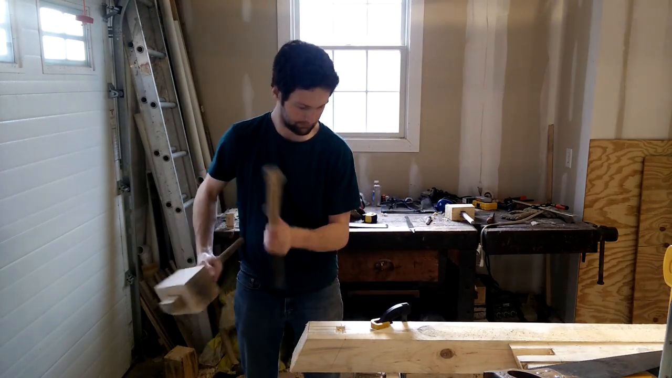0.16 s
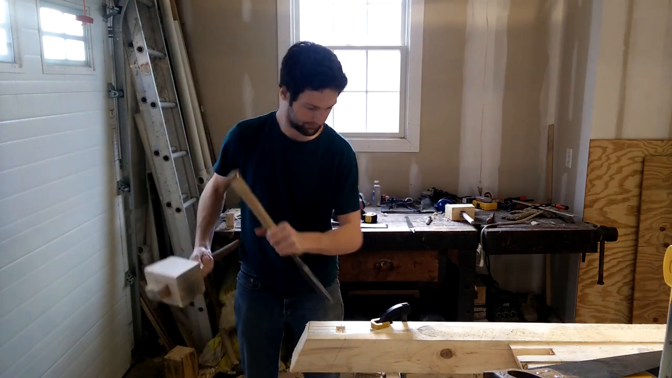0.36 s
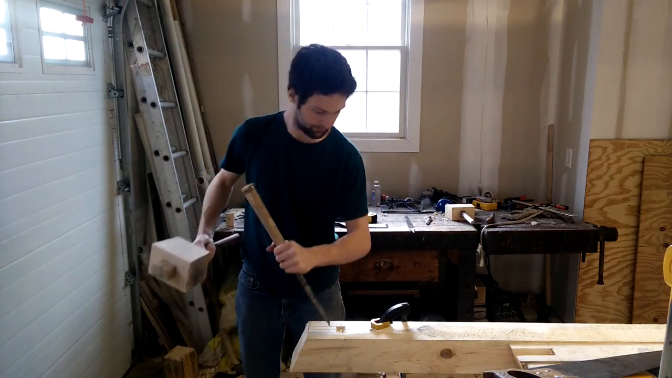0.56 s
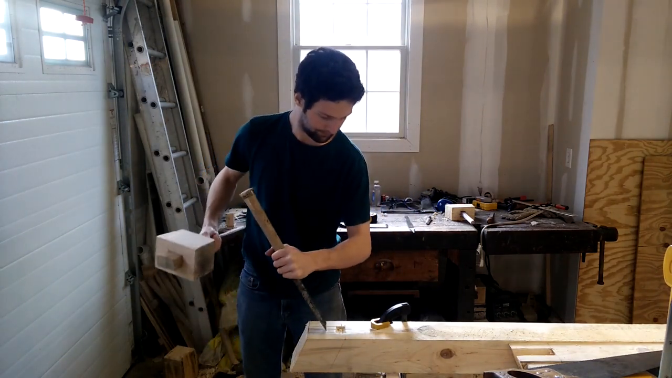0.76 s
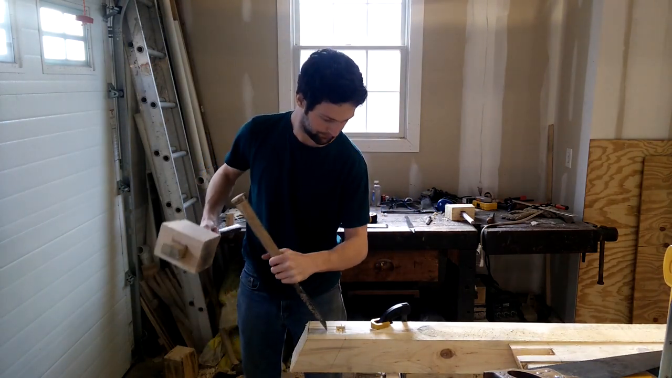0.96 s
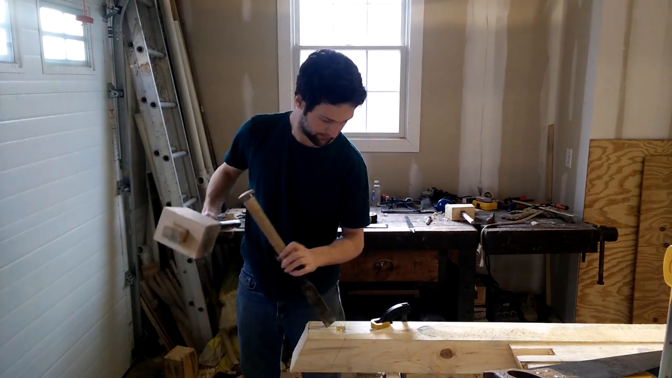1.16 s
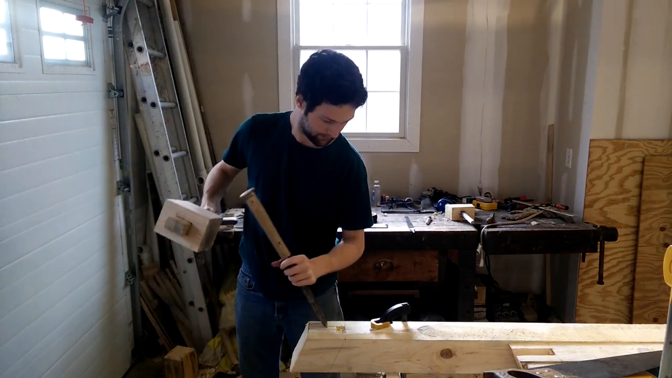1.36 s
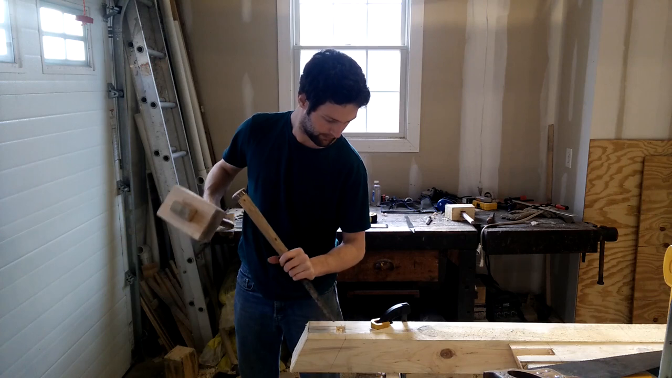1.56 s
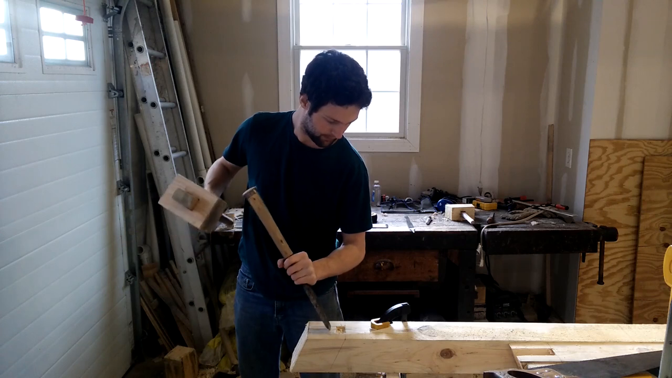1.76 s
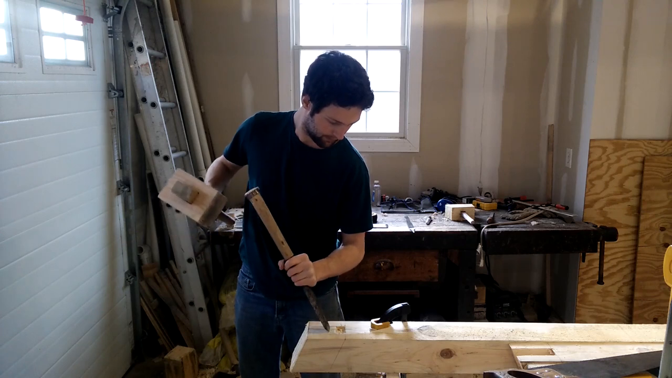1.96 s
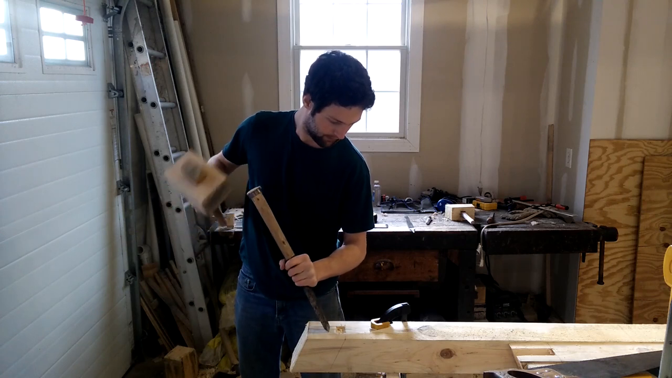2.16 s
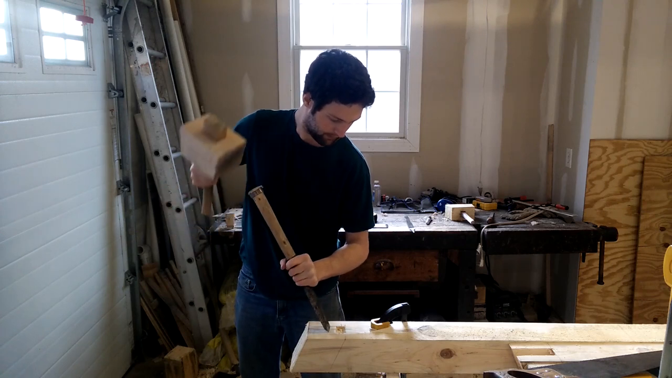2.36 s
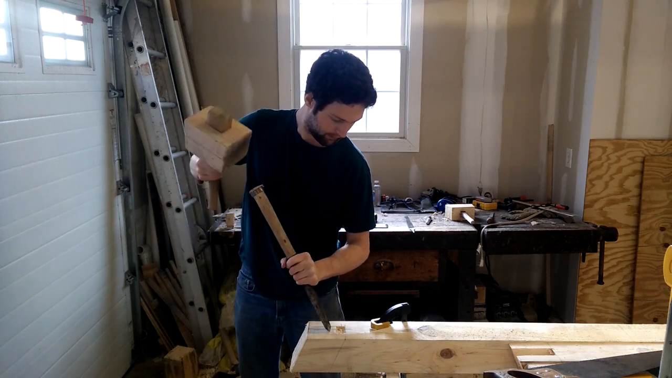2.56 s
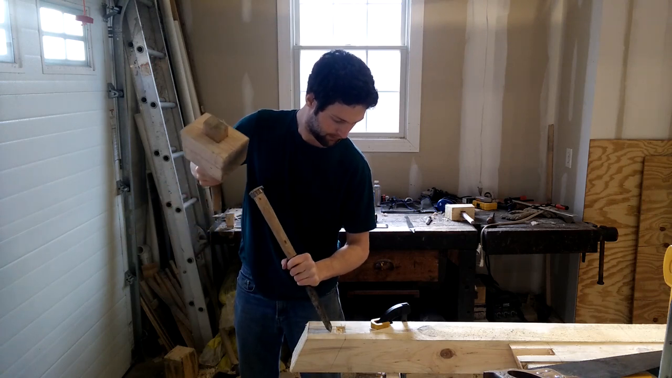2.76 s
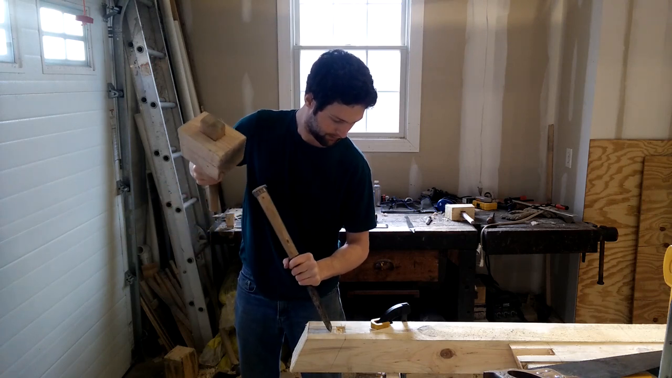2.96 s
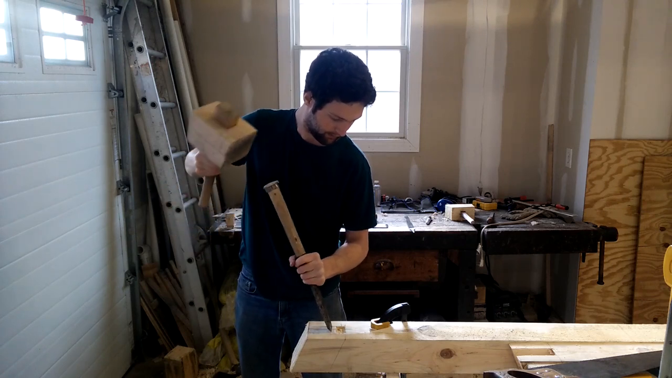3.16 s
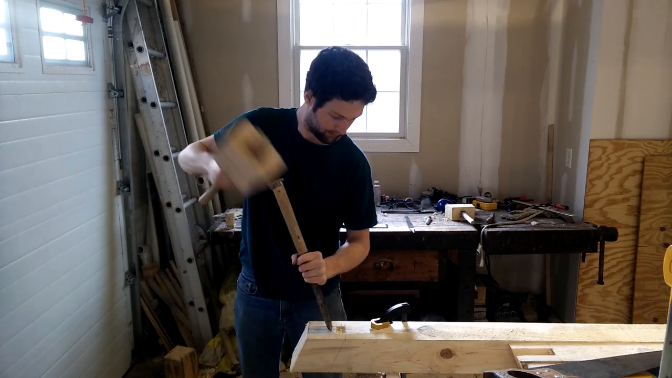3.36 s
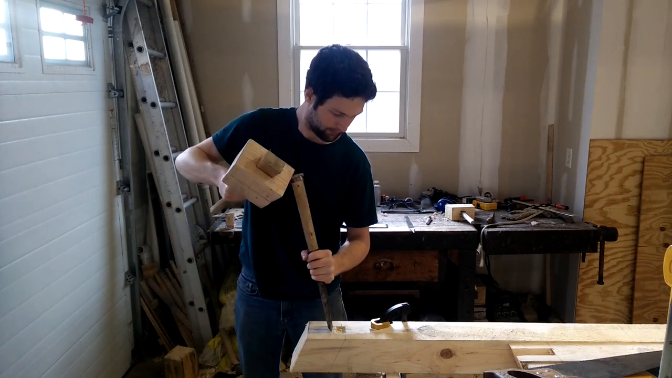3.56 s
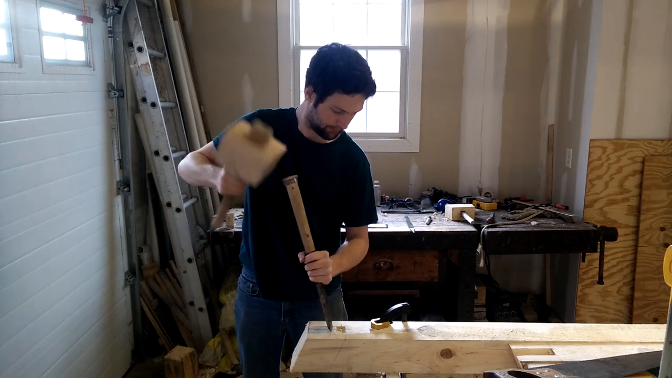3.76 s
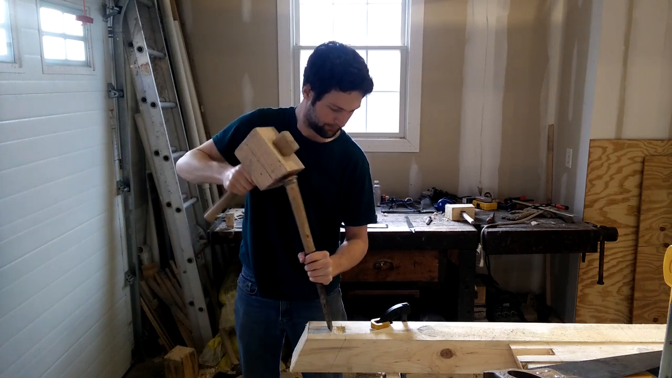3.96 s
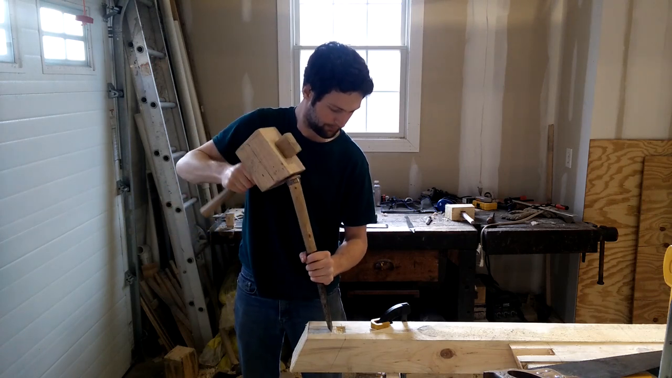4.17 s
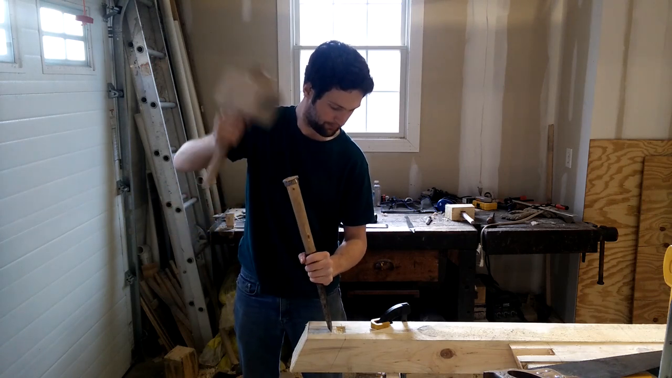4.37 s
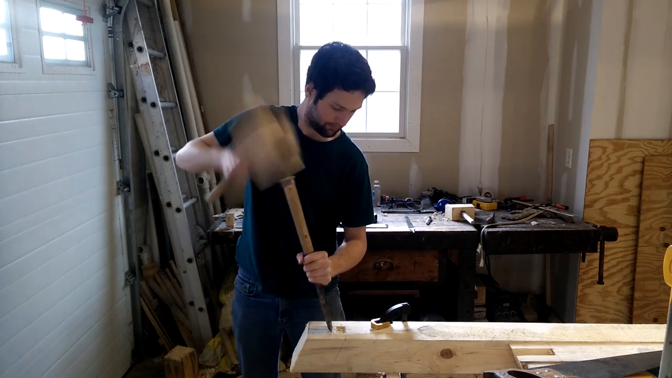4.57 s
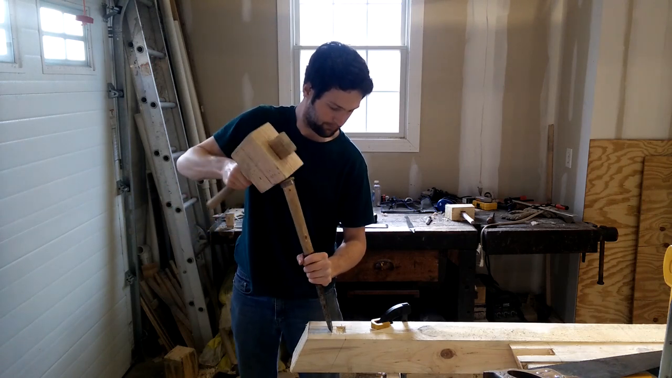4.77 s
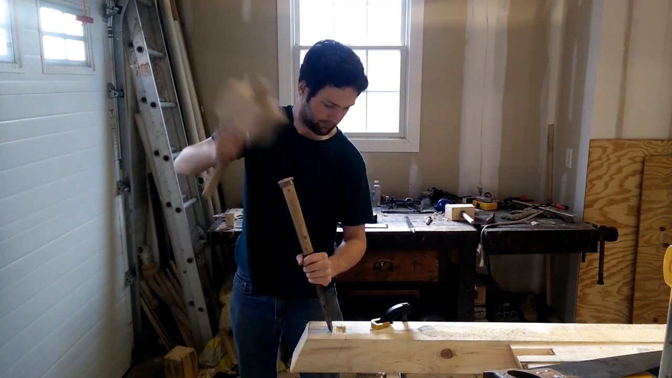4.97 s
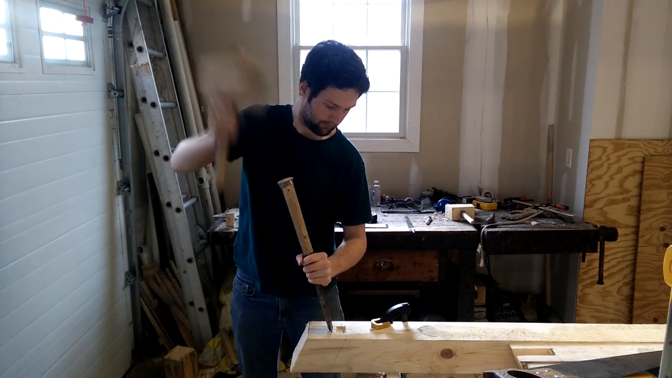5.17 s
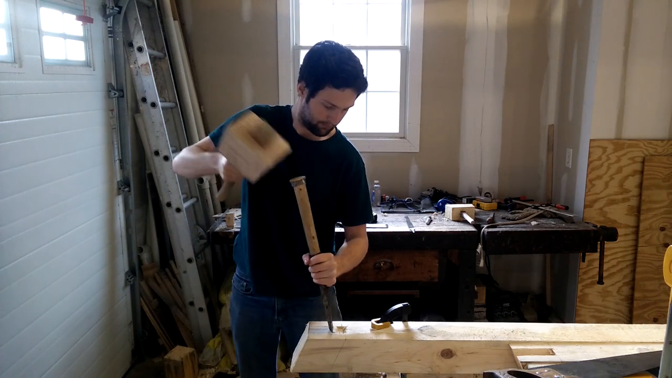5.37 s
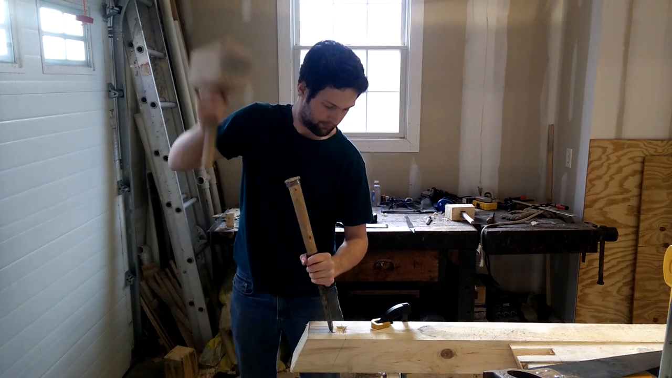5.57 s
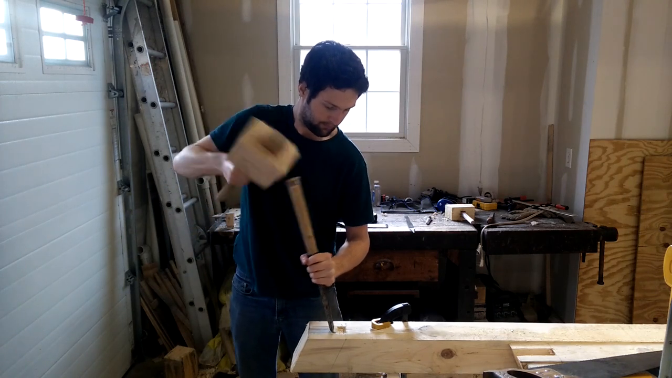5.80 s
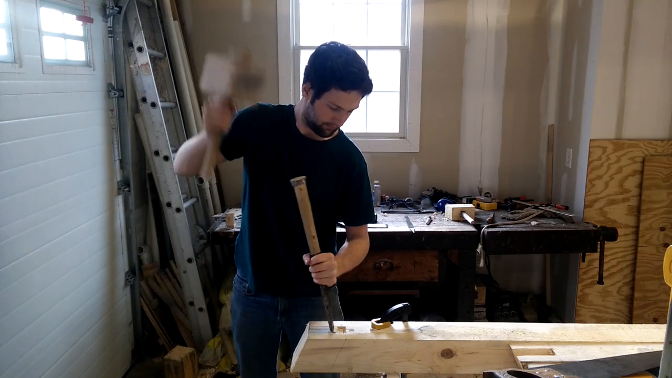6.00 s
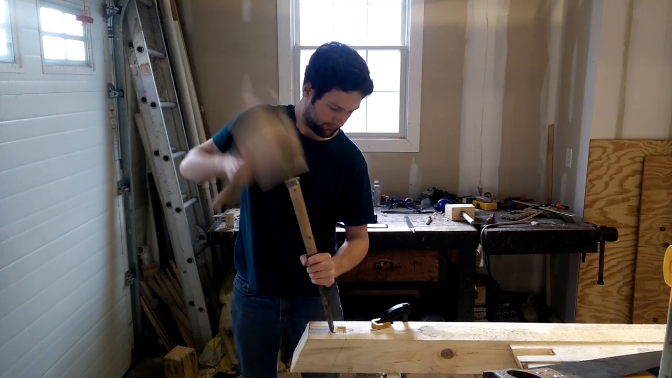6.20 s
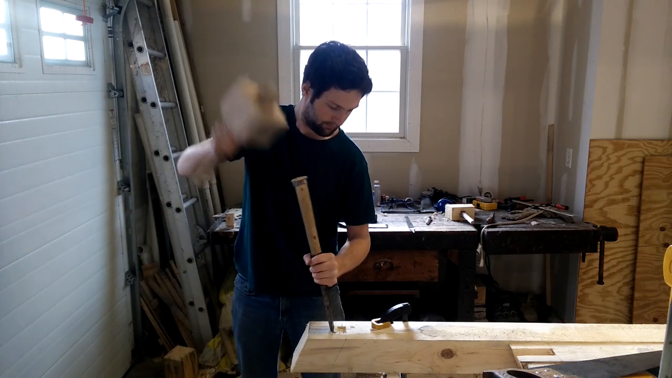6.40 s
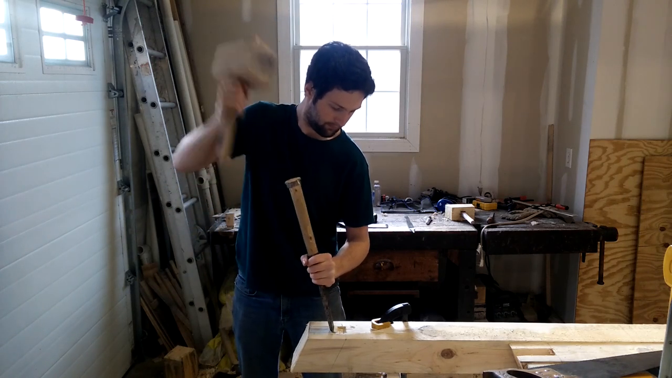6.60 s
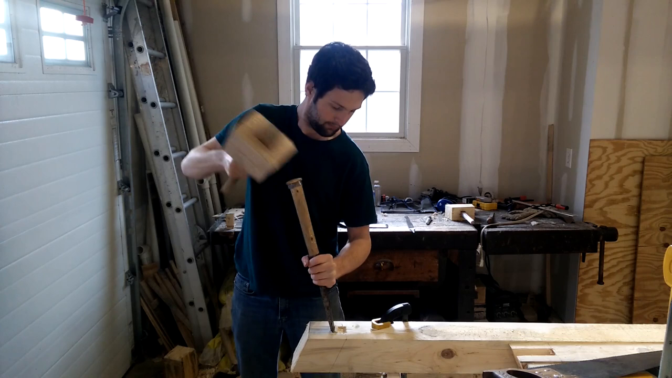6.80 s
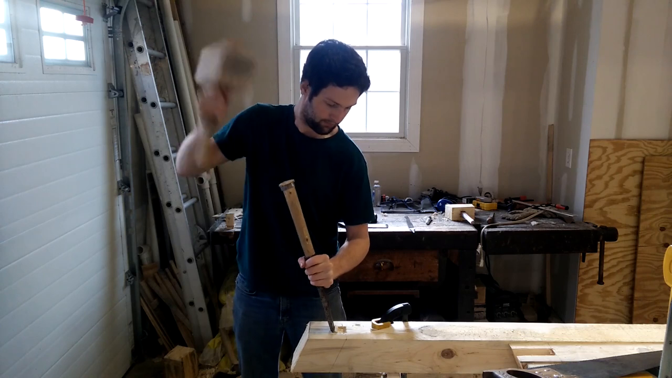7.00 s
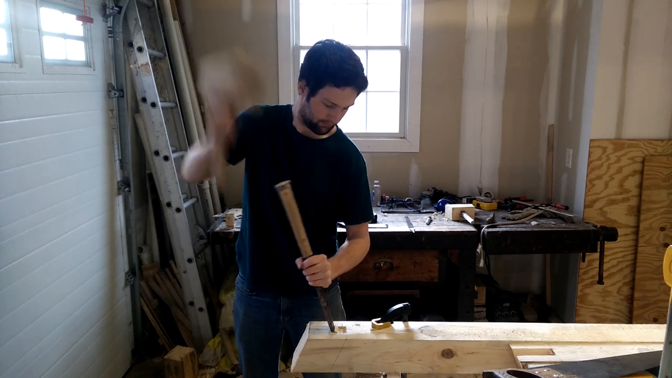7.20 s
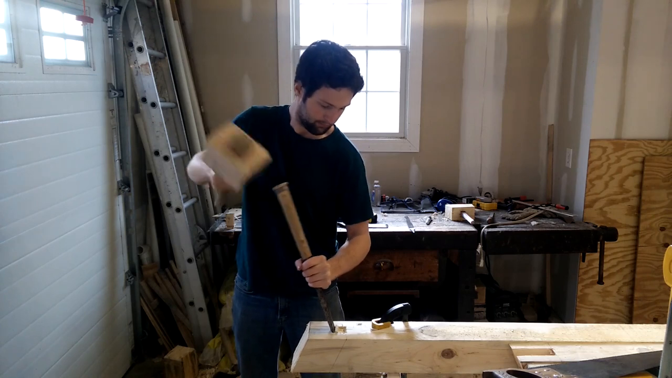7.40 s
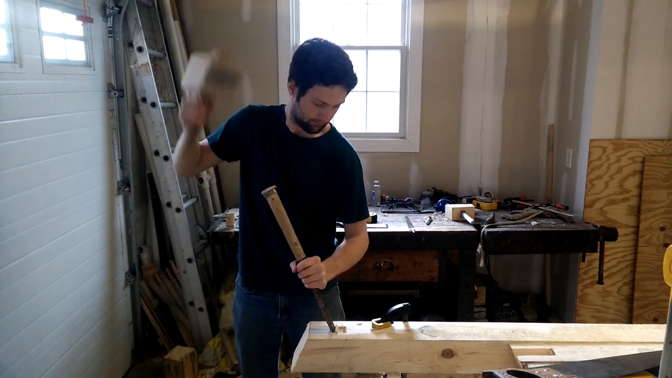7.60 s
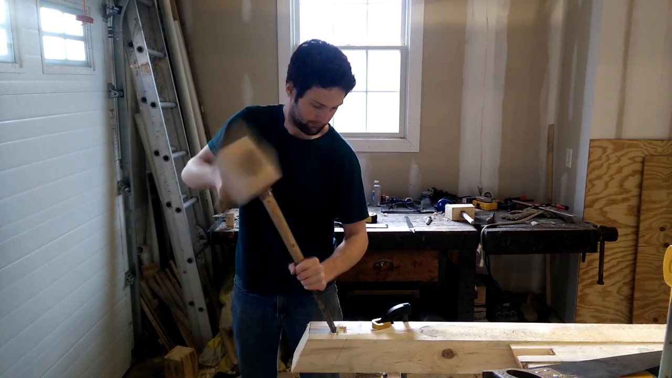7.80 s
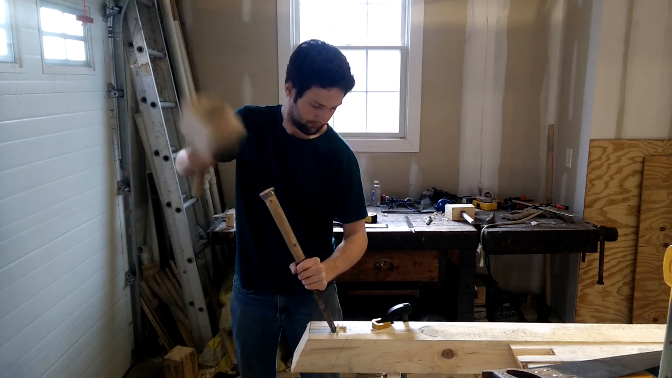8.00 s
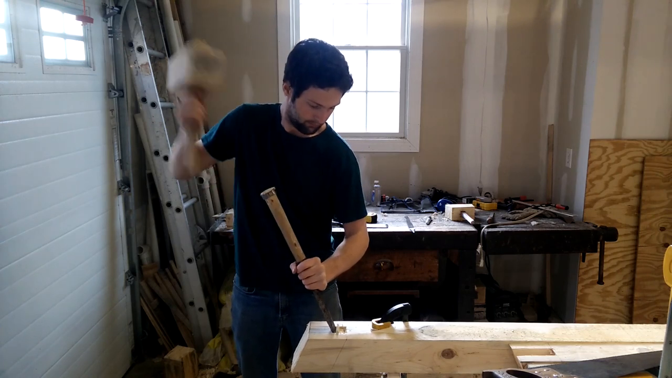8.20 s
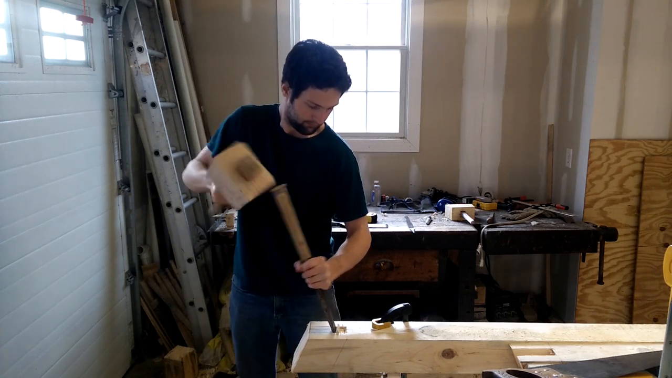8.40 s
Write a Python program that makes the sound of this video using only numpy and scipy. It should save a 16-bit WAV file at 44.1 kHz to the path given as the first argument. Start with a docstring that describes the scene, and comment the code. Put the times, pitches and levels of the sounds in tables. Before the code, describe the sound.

Quiet low room rumble and soft gritty footfalls come first, then two moderate knocks of a wooden mallet on a chisel, with short rising squeaks of steel in wood. Eight much harder blows follow in a steady run, booming through the timber and floor and ringing around the hard room. Their peaks distort in the stereo microphone; the right side is brighter and louder than the muffled left.

```python
"""A low rumble fills a bare, echoing workshop, made of noise shaped in pitch.
A worker shifts his feet: short thumps, gritty ticks and slides, all of them noise bursts.
The chisel edge squeaks (short rising tones) around two easy blows of a heavy wooden mallet.
Then come eight hard blows into the timber beam: noise for crack, clatter and thud, fading sines for ringing.
The hard blows overload a stereo microphone whose left side is dull."""
import sys
import numpy as np
from scipy import signal
from scipy.fft import rfft, irfft, next_fast_len
from scipy.io import wavfile
from scipy.ndimage import uniform_filter1d

SR = 44100
rng = np.random.default_rng(int(sys.argv[2]) if len(sys.argv) > 2 else 0)


def to_wav(sig):
    """Store sig (one row per channel, or 1-D mono) as 16-bit WAV at the path in sys.argv[1].

    Samples outside -1..1 are clipped; the rate is SR.
    """
    pcm = np.clip(np.atleast_2d(sig), -1, 1) * 32767
    pcm = np.round(pcm).astype(np.int16)
    wavfile.write(sys.argv[1], SR, pcm.T)  # frames by channels


N = 372644
RING = int(1.4 * SR)  # length of one event with its echo, in samples
AGE = np.arange(RING) / SR  # time since an event began, in seconds


def undb(db):
    """Turn decibels into a plain multiplier: 20 dB is ten times the amplitude."""
    return 10 ** (np.asarray(db) / 20)


def along(points, n):
    """Read a table of (frequency [Hz], value) at each frequency of an n-sample spectrum, on a log axis."""
    hz, value = np.transpose(points)
    bins_hz = np.arange(n // 2 + 1) * SR / n
    return np.interp(np.log(bins_hz + 1), np.log(hz), value)


# how alike the two sides of the microphone hear the room: (frequency [Hz], correlation)
SIDE_LIKENESS = [(60, 0.92), (130, 0.93), (290, 0.88), (640, 0.41), (1400, 0.19), (16000, 0.42)]


def air(n):
    """Stereo noise arriving from all around: long waves reach both sides alike, short waves do not."""
    mid, side = rfft(rng.standard_normal((2, n)))
    alike = np.clip(along(SIDE_LIKENESS, n), -1, 1)
    shared = mid * np.sqrt((1 + alike) / 2)
    opposed = side * np.sqrt((1 - alike) / 2)
    return irfft(shared + np.array([[1], [-1]]) * opposed, n)


def tint(x, colour):
    """Colour noise by making some frequencies stronger than others, then set its rms to 1."""
    n = x.shape[-1]
    y = irfft(rfft(x) * undb(along(colour, n)), n)
    return y / np.std(y)


def steady(x, seconds):
    """Even out the slow swells of noise by dividing by its own running loudness."""
    power = np.mean(x ** 2, axis=0)
    running = uniform_filter1d(power, int(seconds * SR))
    return x / np.sqrt(running / np.mean(x ** 2) + 1e-6)


def fade(t60):
    """Die away by the same ratio every moment, 60 dB down after t60 seconds."""
    return np.exp(-np.log(1000) * AGE / t60)


def add(out, s, x):
    """Mix a sound in at time s, in seconds."""
    start = int(max(s, 0) * SR)
    out[:, start:start + x.shape[1]] += x[:, :N - start]


# how long the workshop echoes: (frequency [Hz], time to fall 60 dB [s])
ROOM_DECAY = [(40, 0.94), (130, 0.47), (330, 0.85), (900, 0.91), (2400, 0.79), (6400, 0.65), (14000, 0.45)]


def room(x, bloom_cycles=2.44):
    """Walls soak up each band of noise at its own pace; low bands take longer to build up."""
    spectrum, out = rfft(x), 0
    for k, (hz, t60) in enumerate(ROOM_DECAY):
        share = along([(f, j == k) for j, (f, _) in enumerate(ROOM_DECAY)], RING)
        band = steady(irfft(spectrum * share, RING), 0.13)
        build_up = 1 - np.exp(-AGE * hz / bloom_cycles)
        out = out + band * fade(t60) * build_up
    return out


# colour of the workshop rumble: (frequency [Hz], level [dB])
RUMBLE_COLOUR = [(15, -56), (25, -29.5), (43, -1.5), (59, -5.5), (114, -7), (175, -7.5), (301, -13),
                 (503, -20), (560, -25), (775, -27.5), (863, -30), (1890, -32.5), (4250, -44),
                 (6560, -39.5), (16000, -87)]


def background(level_db=-41.5, rumble_cut_hz=28):
    """The low, even rumble of the workshop: coloured noise with the deepest part filtered off."""
    high_pass = signal.butter(2, rumble_cut_hz, "high", fs=SR, output="sos")
    return signal.sosfilt(high_pass, tint(air(N), RUMBLE_COLOUR)) * undb(level_db)


# colour of grit under a shoe: (frequency [Hz], level [dB])
GRIT_COLOUR = [(80, -30), (400, 8.5), (700, -1), (1200, -4.5), (1900, -3), (3000, -12), (4500, -9),
               (6800, -19.5), (9000, -35.5), (16000, -45.5)]


def grit(n, spread_db=2.5):
    """Grit crunches grain by grain: noise cut into millisecond pieces of uneven strength."""
    grain = SR // 1000
    # most grains are weak, a few are strong
    sizes = undb(spread_db * np.minimum(rng.exponential(size=n // grain + 1), 4))
    return tint(air(n) * np.repeat(sizes, grain)[:n], GRIT_COLOUR)


# a sole sliding over the floor, or the blade rubbing in its cut: (time [s], length [s], level [dB])
SLIDE_TIMES = [(0, 0.22, -57.5), (1.969, 0.14, -44.5), (2.28, 0.32, -43.5), (3.05, 0.46, -54),
               (4.302, 0.43, -47.5)]


def sliding(rise_s=0.049, t60_s=0.69):
    """Each slide swells, holds for its length and dies away, rasping over grit."""
    out = np.zeros((2, N))
    for s, length, db in SLIDE_TIMES:
        rise = np.minimum(AGE / rise_s, 1)
        release = np.minimum(np.exp(-np.log(1000) * (AGE - length) / t60_s), 1)
        add(out, s, undb(db) * rise * release * grit(RING))
    return out


# soft footfalls: (time [s], level [dB])
FOOTFALLS = [(.765, -27), (1.994, -22), (2.555, -29.5), (2.845, -31.5)]
# colour of a footfall: (frequency [Hz], level [dB])
FOOTFALL_COLOUR = [(30, -34), (80, 2), (150, -2), (200, -1.5), (265, -1), (340, -16.5), (700, -23),
                   (1500, -39), (5000, -47), (9000, -60), (16000, -65)]


def footfalls(t60=0.21, room_db=-3, rise_s=0.0064):
    """A sole thumps the floor: a short dull noise burst with its echo."""
    out = np.zeros((2, N))
    for s, db in FOOTFALLS:
        thump = steady(tint(air(RING), FOOTFALL_COLOUR), 0.032) * fade(t60)
        thump += undb(room_db) * room(tint(air(RING), FOOTFALL_COLOUR))
        add(out, s, undb(db) * thump * (1 - np.exp(-AGE / rise_s)))
    return out


# grit under a shoe and small knocks of handling: (time [s], level [dB])
SCUFF_TIMES = [(.76, -41), (2.226, -28), (2.295, -36), (2.439, -38), (2.524, -25), (2.554, -25.5),
               (2.815, -40.5), (3.322, -41.5)]
# colour of the tick that rings in a scuff: (frequency [Hz], level [dB])
TICK_COLOUR = [(2500, -28), (4000, -8), (4700, 2), (5500, -15), (8000, -42)]


def scuffs(grit_t60=0.04, room_db=-10, rise_s=0.0015, tick_db=-7, tick_t60=0.031):
    """Grit is crushed in a brief crunch, with a high tick and a faint echo."""
    out = np.zeros((2, N))
    for s, db in SCUFF_TIMES:
        scuff = grit(RING) * fade(grit_t60)
        scuff += undb(room_db) * room(tint(air(RING), GRIT_COLOUR))
        scuff += undb(tick_db) * tint(air(RING), TICK_COLOUR) * fade(tick_t60)
        add(out, s, undb(db) * scuff * (1 - np.exp(-AGE / rise_s)))
    return out


# the blade squeaks as it is rocked in the cut: (time [s], middle pitch [Hz], level [dB], length [s])
SQUEAK_TIMES = [(3.287, 1800, -43.5, 0.022), (3.903, 1990, -24, 0.011), (3.923, 1933, -10, 0.0084),
                (4.468, 1990, -38.5, 0.018)]
# colour of the rasp that goes with a squeak: (frequency [Hz], level [dB])
RASP_COLOUR = [(300, -24), (1200, 0), (2100, -8.5), (3200, -7), (5500, -13.5), (7200, -18.5), (9500, -32),
               (16000, -39)]


def squeaks(glide=0.37, rasp_db=-23, room_db=-1, direct_left_db=-8):
    """Steel slips against the wood in a short rising chirp and a rasp, which the room prolongs."""
    out = np.zeros((2, N))
    for s, hz, db, length in SQUEAK_TIMES:
        progress = np.linspace(0, 1, int(length * SR))
        # glide is the whole rise in pitch, as a part of the middle pitch
        pitch_hz = hz * (1 + glide * (progress - .5))
        chirp = np.sin(2 * np.pi * np.cumsum(pitch_hz) / SR) * np.sin(np.pi * progress) ** 2
        echoes = room(air(RING))
        echoes = undb(room_db) * echoes / np.linalg.norm(echoes[1])
        # the direct sound comes first, weaker on the left
        echoes[:, 0] += undb([direct_left_db, 0])
        add(out, s, undb(db) * signal.fftconvolve(echoes, chirp[None], axes=1))
        add(out, s, undb(db + rasp_db) * room(tint(air(RING), RASP_COLOUR)))
    return out


def by_strength(at_0_db, change_per_db, strength_db):
    """A quality of a blow that follows its strength in a straight line."""
    return at_0_db + change_per_db * strength_db


def region(hz, centre_hz, octaves):
    """A bell-shaped weight around one frequency, where one wooden or steel part rings."""
    return np.exp(-(np.log2(hz / centre_hz) / octaves) ** 2)


def blow_colour(hz, strength_db, clack_db, blade_db):
    """How a blow shares its force among beam, handle and blade, in dB; harder blows are brighter."""
    tilt_db = by_strength(0.26, 0.11, strength_db)  # dB per octave
    # the boom of the beam grows less than the rest
    boom_db = by_strength(0.8, -0.5, strength_db)
    beam = boom_db * region(hz, 250, .35)
    handle = clack_db * region(hz, 1300, .42)
    blade = blade_db * region(hz, 3290, .13)
    return tilt_db * np.log2(hz / 500) + beam + handle + blade


# what beam, chisel and room ring with: (frequency [Hz], level [dB], time to fall 60 dB [s])
RINGING_TONES = [(52.2, -13, 1.23), (87.6, 0, 0.47), (133.7, 3.5, 0.19), (177.8, 3.5, 0.21),
                 (243.3, -0.5, 0.77), (265.1, -1.5, 0.75), (279.7, -4.5, 0.88), (323.6, -4.5, 0.79),
                 (344.4, 3, 0.51), (369.6, 1.5, 0.5), (384.8, -3.5, 0.65), (394.6, -1.5, 0.92),
                 (417, -4, 0.67), (430, -4, 0.76), (512.6, -5.5, 0.76), (528, -4, 0.67),
                 (577.5, -6.5, 0.55), (606, -7, 0.8), (629, -0.5, 0.89), (657.6, -7, 0.71),
                 (730.4, -7, 0.84), (751.2, -1.5, 0.79), (752, -2, 0.74), (905, 1, 0.71), (1021, -17, 0.97),
                 (1167, -9.5, 0.89), (1243, -15, 0.72), (1258, -9.5, 0.72), (1317, -6.5, 0.75),
                 (1503, -12.5, 0.82)]


def ringing(colour, port_phase, scatter_db=1.5, detune=0.0009, build_cycles=0.86):
    """Struck parts ring in fading tones, levels and pitches varied slightly at random from blow to blow."""
    out = 0
    variation = rng.standard_normal((len(RINGING_TONES), 2))
    for (hz, db, t60), (start, lag), (size, shift) in zip(RINGING_TONES, port_phase, variation):
        # short waves reach the two sides out of step
        side_step = np.array([[0], [np.sign(lag - .5) * min(hz / 520, 1.5)]])
        phase = 2 * np.pi * (hz * (1 + detune * shift) * AGE + start) + side_step
        level = undb(db + scatter_db * size + colour(hz))
        build_up = 1 - np.exp(-AGE * hz / build_cycles)
        out = out + level * np.sin(phase) * fade(t60) * build_up
    return out


# colour of the thud as trestles and floor take the force: (frequency [Hz], level [dB])
THUD_COLOUR = [(25, -25.5), (65, -19), (85, -3.5), (130, -1.5), (152, -11), (172, 2.5), (200, -21.5),
               (400, -36), (2000, -76.5)]


def floor_thud(t60=0.25, rise_s=0.022):
    """The heavy beam is slow to get moving, so this deep noise burst swells late."""
    rise = 1 - np.exp(-(AGE / rise_s) ** 2)
    return steady(tint(air(RING), THUD_COLOUR), 0.042) * fade(t60) * rise


# mallet blows; the last three levels are added to those parts of the blow:
# (time [s], strength [dB], crack [dB], handle clack [dB], blade ring [dB])
MALLET_BLOWS = [(3.4635, -11.5, 3, 3.5, 2.5), (4.0187, -11, -20, -3.5, 2), (4.661, 0, 3, 0.5, -2.5),
                (5.321, 1, -1, 0, 1.5), (5.844, 1.5, 4, 0.5, -3.5), (6.301, 2, 1.5, 1.5, -3),
                (6.789, 2, 2.5, 2, -1), (7.324, 0, 5, 1, 3), (7.856, -0.5, 2, 1.5, 8),
                (8.366, 1.5, 11.5, -0.5, 8.5)]
# dense wooden clatter of a blow as it fills the room: (frequency [Hz], level [dB])
CLATTER_COLOUR = [(25, -26.5), (60, -15.5), (95, -0.5), (200, -2.5), (270, 0), (420, -1), (740, -1.5),
                  (900, -8.5), (1400, -7.5), (1750, -18.5), (3500, -21), (6600, -30.5), (8200, -46.5),
                  (16000, -48.5)]
# first contact of mallet and handle: (frequency [Hz], level [dB])
CRACK_COLOUR = [(100, -22), (600, 4.5), (1400, 12), (3000, 2.5), (6500, -12.5), (9000, -22), (16000, -47)]


def mallet(clatter_db=6.5, modes_db=-1.0, crack_db=3, crack_t60=0.038, change=0.73,
           contact_s=0.0017, thud_db=2):
    """Each blow cracks, rings the beam, shakes the floor and fills the room along similar echo paths."""
    out, paths = np.zeros((2, N)), air(RING)
    port_phase = rng.random((len(RINGING_TONES), 2))
    bins_hz = np.arange(RING // 2 + 1) * SR / RING + 1
    for s, db, sharp_db, clack_db, blade_db in MALLET_BLOWS:
        def colour(hz):
            """The colour of this one blow, in dB."""
            return blow_colour(hz, db, clack_db, blade_db)

        # part of the echo noise is shared by all blows, part is new
        wood = tint(paths + change * air(RING), CLATTER_COLOUR)
        clatter = room(irfft(rfft(wood) * undb(colour(bins_hz)), RING))
        crack = tint(air(RING), CRACK_COLOUR) * fade(crack_t60)
        thud = floor_thud()
        # a harder blow shakes the floor more
        floor_db = by_strength(3, 1.54, db)
        blow = undb(clatter_db) * clatter + undb(modes_db) * ringing(colour, port_phase)
        blow += undb(crack_db + sharp_db) * crack + undb(thud_db + floor_db) * thud
        # wood on wood: the contact force takes a moment to build
        contact = 1 - np.exp(-(AGE / contact_s) ** 2)
        add(out, s, undb(db) * blow * contact)
    return out


def scene():
    """Everything as it reaches the two sides of the microphone."""
    return mallet() + footfalls() + scuffs() + sliding() + squeaks() + background()


# response of the dull left side: (frequency [Hz], level [dB])
LEFT_RESPONSE = [(60, 1.5), (300, 1.5), (700, -1), (1300, -5.5), (2400, -9.5), (4400, -19), (8000, -15),
                 (15000, -7)]


def dull_left(x, share, lag_s=0.00021):
    """Give the left side a share of its treble loss and of the slight lag that comes with it."""
    padded = 2 * next_fast_len(N)
    bins_hz = np.arange(padded // 2 + 1) * SR / padded
    lag = np.exp(-2j * np.pi * bins_hz * share * lag_s)
    response = undb(share * along(LEFT_RESPONSE, padded))
    left = irfft(rfft(x[0], padded) * response * lag, padded)[:N]
    return np.array([left, x[1]])


def record(dry, left_db=-4.5, ceiling=0.92, knee=10, port_share=0.66, top_hz=15900):
    """Both sides overload into flat tops; the weaker left loses treble before and after the overload."""
    driven = dull_left(dry * undb([[left_db], [0]]), port_share)
    # a high knee keeps quiet sounds clean and bends only the loud peaks
    flattened = ceiling * driven / (1 + np.abs(driven) ** knee) ** (1 / knee)
    low_pass = signal.ellip(8, .1, 70, top_hz, fs=SR, output="sos")
    return signal.sosfilt(low_pass, dull_left(flattened, 1 - port_share))


dry = scene()
out = record(dry)
to_wav(out)
```